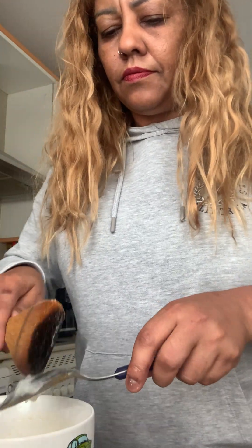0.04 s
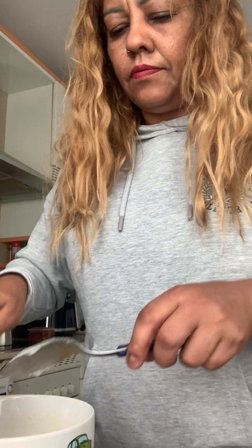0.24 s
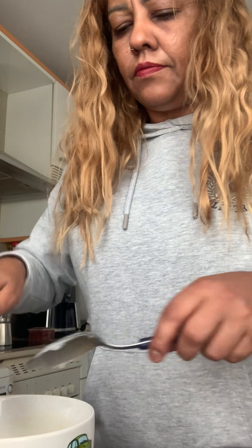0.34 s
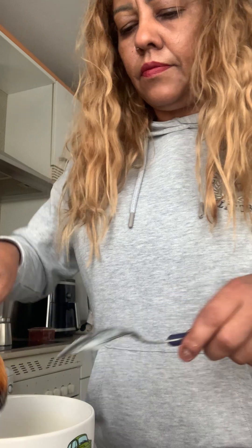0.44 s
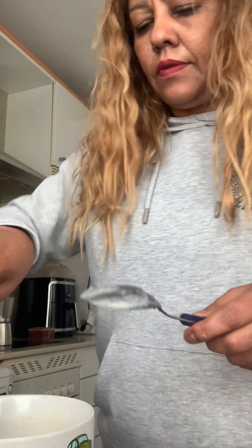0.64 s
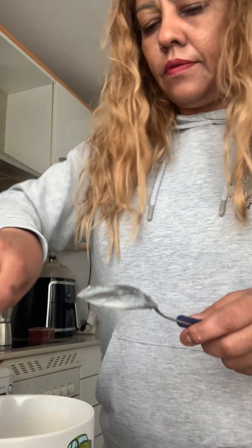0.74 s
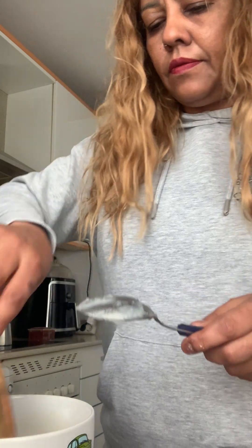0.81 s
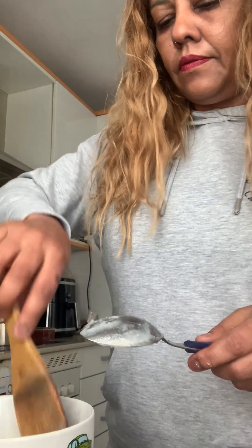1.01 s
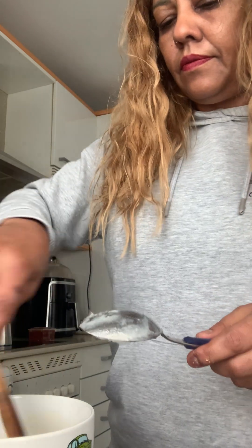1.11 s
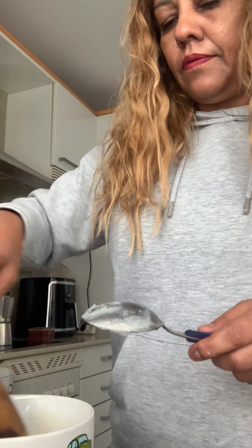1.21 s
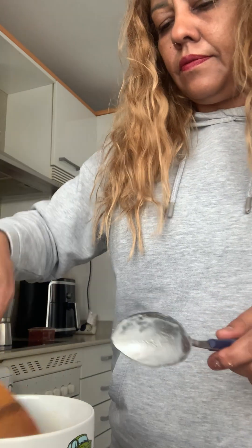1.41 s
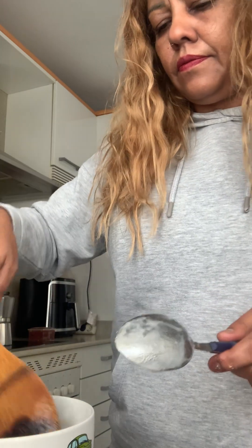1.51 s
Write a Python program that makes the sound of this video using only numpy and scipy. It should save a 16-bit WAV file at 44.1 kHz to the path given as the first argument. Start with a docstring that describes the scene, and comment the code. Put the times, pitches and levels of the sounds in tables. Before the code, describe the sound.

A metal spoon clinks on a ceramic bowl, which clunks on the worktop. After lighter taps, a wooden spoon sinks into thick paste with a gulp and stirs, knocking the sides. Heard close by in a small kitchen.

```python
"""A scrape dies away. At 0.2 s a metal spoon clinks on a ceramic bowl and the bowl clunks on the
worktop: each impact excites the damped modes of the bodies in contact. Lighter contacts follow.
Just after 1 s a wooden spoon sinks into thick paste with a gulp, then drags through it and
knocks round the wall. Throughout, a small hard kitchen reverberates over a faint room tone,
heard from close by at two spaced microphones."""
import sys
import numpy as np
from scipy import signal
from scipy.fft import rfft, irfft, next_fast_len
from scipy.io import wavfile
from scipy.ndimage import map_coordinates

SR = 44100
rng = np.random.default_rng(int(sys.argv[2]) if len(sys.argv) > 2 else 0)


def put_to_file(sound):
    """Save the sound as 16-bit audio at rate SR, in the file named by the first command-line argument."""
    columns = np.atleast_2d(sound).T  # one column per channel
    safe = np.clip(columns, -1, 1)
    whole_steps = np.round(safe * 32767)
    wavfile.write(sys.argv[1], SR, whole_steps.astype(np.int16))


N = 68355

# Noise spectra. Each row: frequency in Hz, relative spectral density in dB.
ROOM_TONE_SPECTRUM = [(60, 6), (450, -14), (1200, -9.5), (2500, -15.5), (5000, -31), (9000, -19),
                      (11000, -26), (12500, -50)]
SCRAPE_SPECTRUM = [(100, -38), (550, -5), (850, -13), (1700, 3), (2200, -3), (2750, 2), (3900, -6),
                   (4900, -19.5), (6100, -16.5), (7300, -38.5)]
STIR_SPECTRUM = [(70, -5.5), (170, 4.5), (550, 6), (950, -6), (1600, -18.5), (2400, -32.5), (10000, -39)]
KNOCK_SPECTRUM = [(80, -21), (350, 2), (455, -5.5), (560, 5.5), (850, 7), (1060, 1), (1500, -0.5),
                  (2100, -11), (2700, -3.5), (4800, -27.5), (6200, -15), (13000, -41)]
CLINK_SPECTRUM = [(1700, 0.5), (2150, -17), (2600, -5), (3050, -17.5), (3700, -1.5), (4700, -8.5),
                  (6100, 1), (7500, -18.5), (9500, -11), (12000, -29)]
# Diffuse field at the two microphones. Each row: frequency in Hz, correlation of left and right.
FIELD_CORRELATION = [(100, 0.94), (300, 0.44), (650, 0.29), (1400, -0.38), (3200, -0.33), (8000, 0.27)]
# Decay of the kitchen. Each row: frequency in Hz, t60 (time to fall 60 dB) in seconds.
REVERB_TIMES = [(100, 0.44), (700, 0.37), (1500, 0.42), (4000, 0.46), (7000, 0.44), (12000, 0.26)]
# Colour of the reflections. Each row: frequency in Hz, gain in dB.
ECHO_RESPONSE = [(200, 1), (270, -6), (500, -0.5), (1200, 1.5), (1900, 2), (2500, -0.5), (6500, -1.5),
                 (10000, -1), (13000, -5)]
# Envelopes of the friction sounds. Each row: time in seconds, level in dB.
SCRAPE_ENVELOPE = [(0, -42.5), (.08, -52), (.12, -62), (.25, -67), (1.03, -93.5), (1.05, -64.5),
                   (1.365, -74), (1.378, -55), (1.47, -86)]
STIR_ENVELOPE = [(.2, -79.5), (.52, -63.5), (.7, -67.5), (.86, -51), (.99, -84.5), (1.035, -45.5),
                 (1.235, -72), (1.29, -49), (1.45, -53.5), (1.55, -55.5)]
# Normal modes. Each row: frequency in Hz, relative level in dB, nominal t60 in seconds.
WORKTOP_MODES = [(101.8, -7, 0.22), (149.3, -5, 0.08), (176, -6.5, 0.065), (220.4, -1, 0.066),
                 (305, -1.5, 0.054), (378.2, -2.5, 0.064)]
BOWL_MODES = [(352.6, -7.5, .14), (544, -6, 0.0712), (736, -6, 0.085), (944, -4, 0.033), (1165, -13, 0.076),
              (1283.6, -0.5, 0.093), (1466, -5, 0.041), (1818, -12, 0.06), (2560, -15, 0.026),
              (3206, -12.5, 0.051)]  # damped by the paste
SPOON_MODES = [(957, -16.5, 0.052), (1549, -7.5, 0.023), (1741, -8.5, 0.023), (2578, -9, 0.013),
               (3776, -14.5, 0.012), (3938, -7.5, 0.017), (6140, -8, 0.0051), (6200, -17, 0.006),
               (8630, -14, 0.005)]  # damped by the hand
# Knocks on the bowl. Each row: start in seconds, contact noise gain in dB, low-pass cutoff in Hz,
# bowl gain in dB, factor on the bowl's t60, worktop gain in dB.
BOWL_KNOCKS = [(0.2206, -23.5, 2050, -16.5, 0.75, -34), (.2256, -12.5, 6000, -15, 0.59, -29.5),
               (0.2308, -14.5, 2800, -16, 0.66, -21), (0.2378, -16.5, 1380, -22, 0.74, -28),
               (0.2534, -21.5, 2600, -19.5, 0.7, -43.5), (.523, -48.5, 2790, -57.5, 0.26, -52.5),
               (0.747, -33, 1008, -52, 0.44, -36.5), (.828, -39, 1400, -51.5, 0.7, -51.5),
               (1.026, -32, 1400, -52.5, 0.67, -57), (1.044, -28, 1100, -34, 0.48, -39),
               (1.058, -34.5, 453, -53, 0.44, -30), (1.2633, -31, 3420, -32, 0.38, -54),
               (1.266, -29, 1500, -40.5, .3, -48.5), (1.2762, -34, 1300, -36, 1, -39),
               (1.32, -33, 1270, -36, 0.52, -48), (1.377, -27.5, 1200, -40, 0.28, -38.5),
               (1.417, -36.5, 1300, -37.5, 0.67, -66), (1.448, -27.5, 1000, -43.5, 0.22, -45.5)]
# Where the spoon's low, middle, high and top modes lie. Each entry: frequency in Hz.
SPOON_BANDS_HZ = [1800, 2450, 3880, 5700]
# Clinks of the spoon. Each row: start in seconds, pitch factor, gain in dB in each of the four bands.
SPOON_CLINKS = [(0.197, 1, -9.5, -23, -12.5, -9), (0.7409, 0.97, -26, -19, -19.5, -23.5),
                (1.0407, .99, -30, -13.5, -26, -25.5), (1.3721, 1.071, -20, -45, -42, -43.5)]


def undb(db):
    """Amplitude ratio of a level in decibels."""
    return 10 ** (np.asarray(db) / 20)


def unit(x):
    """Normalisation to an rms of 1."""
    return x / np.sqrt(np.mean(x ** 2))


def read(points, hz):
    """Interpolation on a log-frequency axis."""
    known_hz, values = np.array(points, float).T
    return np.interp(np.log(np.maximum(hz, 1)), np.log(known_hz), values)


def bins(size):
    """Frequencies of a Fourier spectrum in Hz."""
    return np.fft.rfftfreq(size, 1 / SR)


def colour(x, points):
    """Minimum-phase filter with the given (Hz, dB) response."""
    size = 2 * next_fast_len(len(x))
    cepstrum = irfft(np.log(undb(read(points, bins(size)))))
    cepstrum[1:size // 2] *= 2  # folding onto positive time makes it causal
    cepstrum[size // 2 + 1:] = 0
    return irfft(rfft(x, size) * np.exp(rfft(cepstrum)), size)[:len(x)]


def rise(t, seconds):
    """First-order onset with the given time constant."""
    return 1 - np.exp(-t / seconds)


def fade(t, t60):
    """Exponential decay, by 60 dB in t60 seconds."""
    return np.exp(-np.log(1000) * t / t60)


def ring(modes, t, t60_factor=1):
    """Free vibration after a blow is a sum of damped sinusoids."""
    return sum(undb(db) * fade(t, t60 * t60_factor) * np.sin(2 * np.pi * hz * t) for hz, db, t60 in modes)


def contact_noise(spectrum, t, t60):
    """A brief impact radiates a decaying broadband burst."""
    return unit(colour(rng.standard_normal(len(t)), spectrum)) * fade(t, t60)


def add(out, start, x):
    """Superposition of x on out from start seconds."""
    i = int(start * SR)
    out[i:i + len(x)] += x[:max(N - i, 0)]


def diffuse():
    """A diffuse field is alike at two spaced points only at long wavelengths."""
    correlation = read(FIELD_CORRELATION, bins(N))
    power_shares = [(1 + correlation) / 2, (1 - correlation) / 2]
    mid, side = rfft(rng.standard_normal((2, N))) * np.sqrt(power_shares)
    return irfft(np.array([mid + side, mid - side]), N)


def room_tone(level_db=-68.5):
    """Stationary noise arrives from all sides as a diffuse field."""
    return undb(level_db) * np.array([unit(colour(side, ROOM_TONE_SPECTRUM)) for side in diffuse()])


def kitchen(x, tail_db=-6.5, cupboard_db=-2, left_lag_s=0.00011):
    """Convolution adds cupboard echoes and a reverberant tail; direct sound reaches the right first."""
    t, log_hz = np.arange(N) / SR, np.log(bins(N) + 1)
    noise = rfft(diffuse())
    centres = np.log([hz for hz, _ in REVERB_TIMES])
    tail = np.zeros((2, N))
    for weights, (_, t60) in zip(np.eye(len(centres)), REVERB_TIMES):
        band = irfft(noise * np.interp(log_hz, centres, weights), N)
        tail += band * fade(t, t60) * rise(t, seconds=0.01)
    cupboards = diffuse() * fade(t, t60=0.11) * rise(t, seconds=0.0006)
    echoes = (undb(tail_db) * unit(tail) + undb(cupboard_db) * unit(cupboards)) / np.sqrt(N)
    reflected = np.array([signal.fftconvolve(x, colour(side, ECHO_RESPONSE))[:N] for side in echoes])
    left = map_coordinates(x, [(t - left_lag_s) * SR])
    return np.array([left, x]) + reflected


def envelope(points):
    """Gain over time, linear in dB between (s, dB) points."""
    return undb(np.interp(np.arange(N) / SR, *np.array(points).T))


def scrape():
    """Friction on the bowl gives bright noise, which the room makes diffuse."""
    hiss = np.array([unit(colour(side, SCRAPE_SPECTRUM)) for side in diffuse()])
    return hiss * envelope(SCRAPE_ENVELOPE)


def stirring(slips_per_s=1500, spread_db=2):
    """Shot noise: tiny random slips of the spoon through paste merge into a soft, grainy drag."""
    sizes = undb(spread_db * rng.exponential(size=N)) * rng.choice([-1, 1], N)
    slips = sizes * (rng.random(N) < slips_per_s / SR)
    return unit(colour(slips, STIR_SPECTRUM)) * envelope(STIR_ENVELOPE)


def gulp(start_s=1.044, swell_s=0.01803, release_s=0.003, from_hz=409, to_hz=231, level_db=-26):
    """Displacement: the sinking spoon squeezes air from the paste in a swelling, falling tone."""
    out, t = np.zeros(N), np.arange(SR // 10) / SR
    hz = np.interp(t, [0, swell_s], [from_hz, to_hz])
    swell = np.interp(t, [0, swell_s, swell_s + release_s], [0, 1, 0])
    add(out, start_s, undb(level_db) * swell * np.sin(2 * np.pi * np.cumsum(hz) / SR))
    return out


def knocks(highpass_hz=78):
    """Blunt impacts excite the modes of bowl and worktop; a soft contact acts as a low-pass filter."""
    out, t = np.zeros(N), np.arange(SR // 2) / SR
    thump = ring(WORKTOP_MODES, t) * rise(t, seconds=0.0014)
    for start, noise_db, cutoff_hz, bowl_db, t60_factor, thump_db in BOWL_KNOCKS:
        bowl = undb(bowl_db) * ring(BOWL_MODES, t, t60_factor)  # spoon and paste shorten the ring
        contact = undb(noise_db) * contact_noise(KNOCK_SPECTRUM, t, t60=0.022)
        hit = (bowl + contact) * rise(t, seconds=0.00028)
        dulled = signal.lfilter(*signal.butter(2, cutoff_hz, fs=SR), hit)
        add(out, start, dulled + undb(thump_db) * thump)
    return signal.lfilter(*signal.butter(4, highpass_hz, "high", fs=SR), out)


def clinks(contact_db=-5, highpass_hz=680):
    """Hard impacts excite the modes of the metal spoon; the clinks carry no bass."""
    out, t = np.zeros(N), np.arange(SR // 4) / SR
    for start, pitch, *bands_db in SPOON_CLINKS:
        spoon = ring(SPOON_MODES, t * pitch)  # the grip detunes the modes
        contact = undb(contact_db) * contact_noise(CLINK_SPECTRUM, t, t60=0.01)
        hit = (spoon + contact) * rise(t, seconds=0.00095)
        weighting = list(zip(SPOON_BANDS_HZ, bands_db))  # the point of contact weights the modes
        add(out, start, colour(hit, weighting))
    return signal.lfilter(*signal.butter(2, highpass_hz, "high", fs=SR), out)


def scene():
    """Superposition: spoons, bowl and paste sound in the kitchen, over the scrape and room tone."""
    background = room_tone()
    direct = clinks() + knocks() + gulp() + stirring()
    return kitchen(direct) + scrape() + background


def record(dry):
    """Band limiting: the deep bass drops, the highest treble dulls and the top is cut off."""
    response_hz_db = [(30, -9.5), (70, 1.5), (10300, -2), (12000, -8)]
    cutoff_hz = 15800
    dulled = np.array([colour(side, response_hz_db) for side in dry])
    return signal.sosfilt(signal.ellip(8, .2, 70, cutoff_hz, fs=SR, output="sos"), dulled)


dry = scene()
out = record(dry)
put_to_file(out)
```